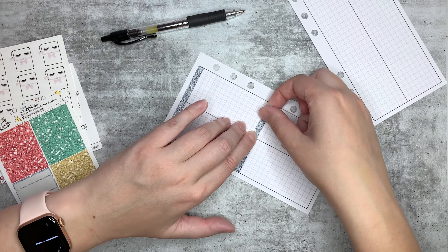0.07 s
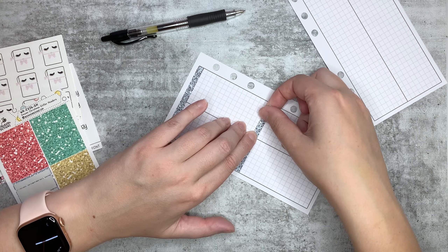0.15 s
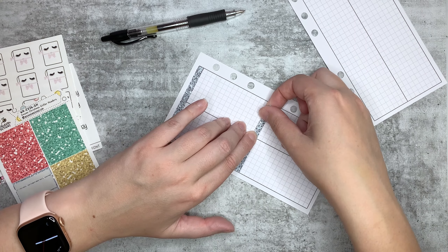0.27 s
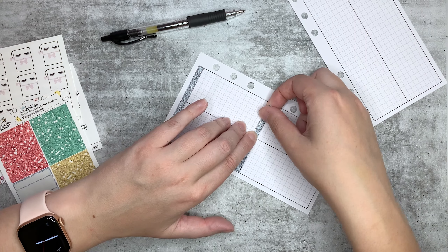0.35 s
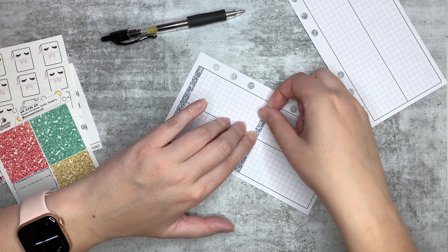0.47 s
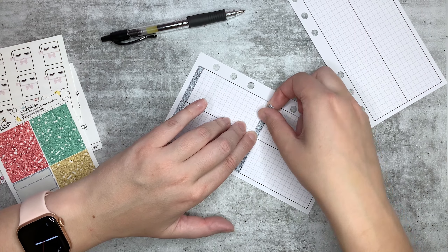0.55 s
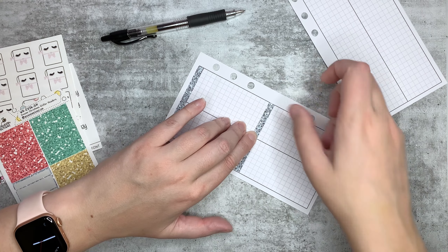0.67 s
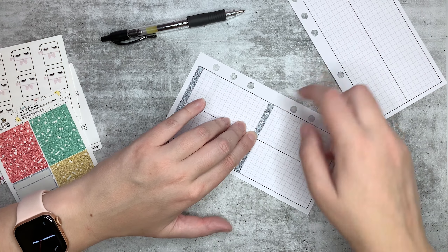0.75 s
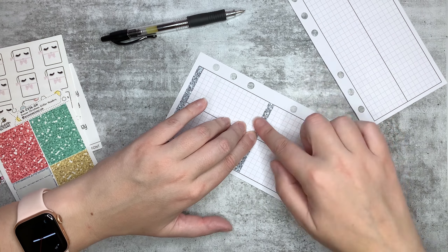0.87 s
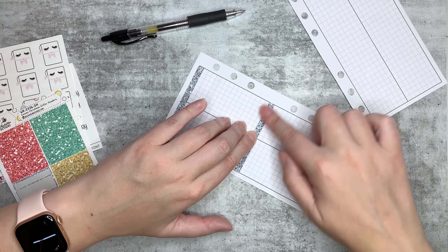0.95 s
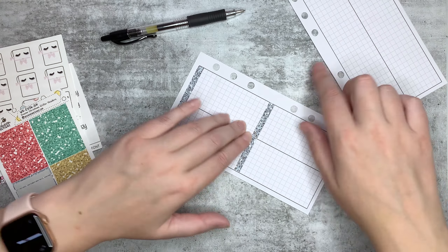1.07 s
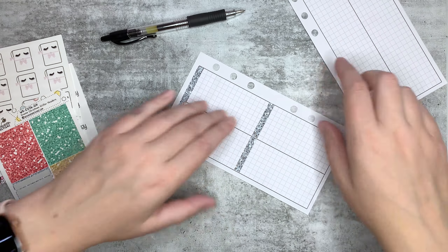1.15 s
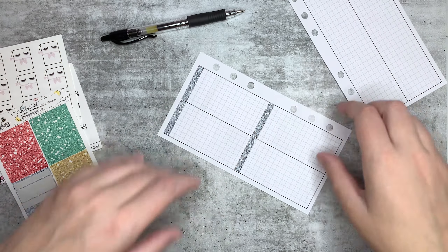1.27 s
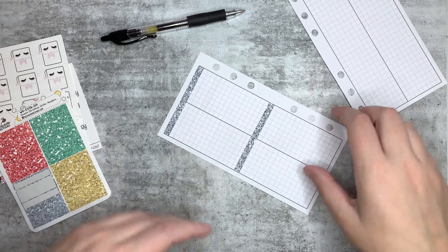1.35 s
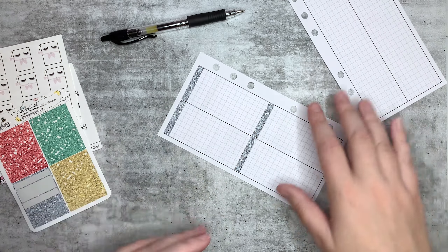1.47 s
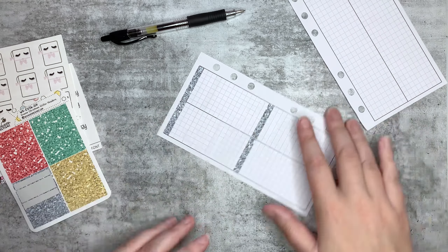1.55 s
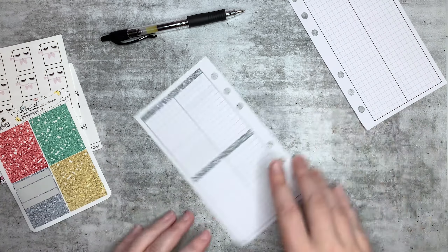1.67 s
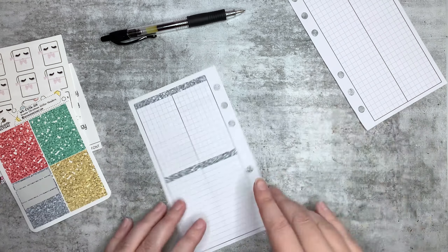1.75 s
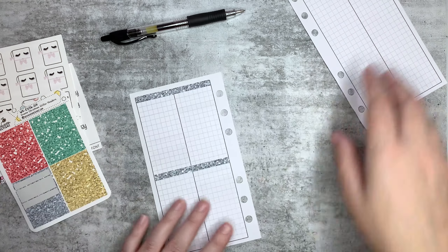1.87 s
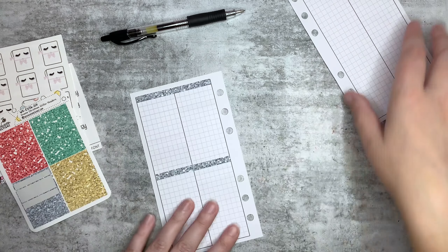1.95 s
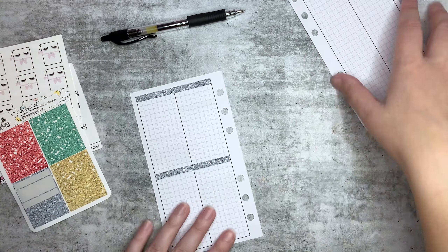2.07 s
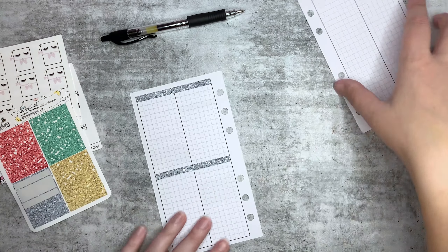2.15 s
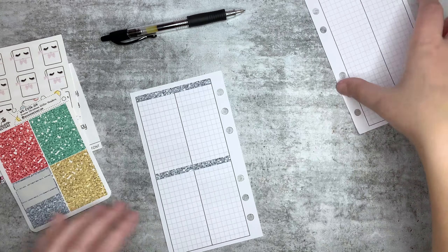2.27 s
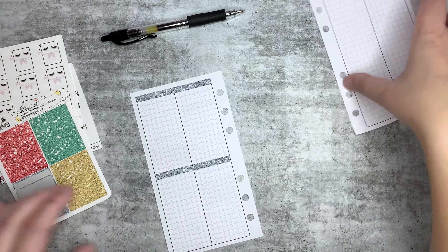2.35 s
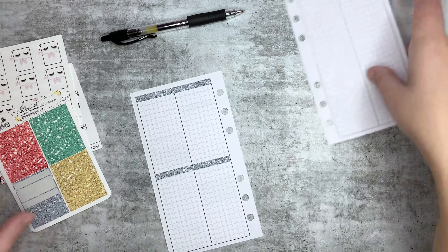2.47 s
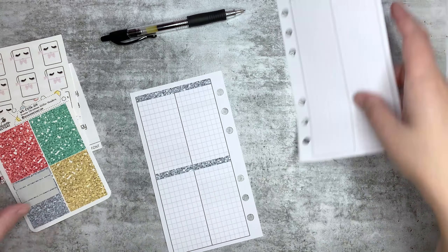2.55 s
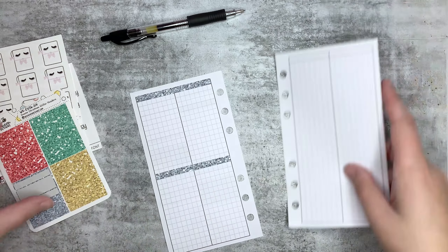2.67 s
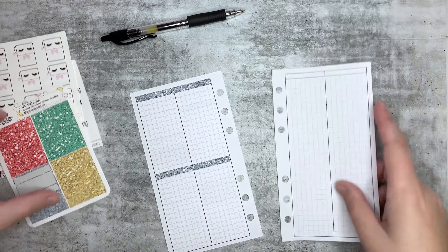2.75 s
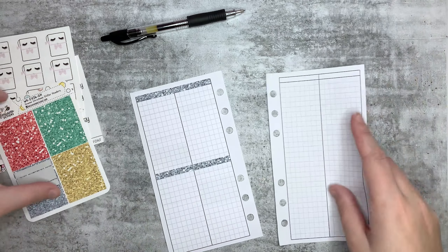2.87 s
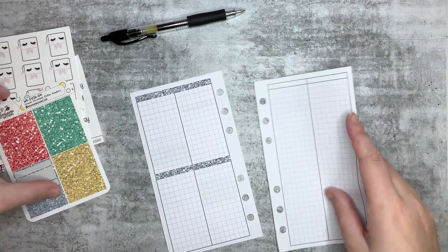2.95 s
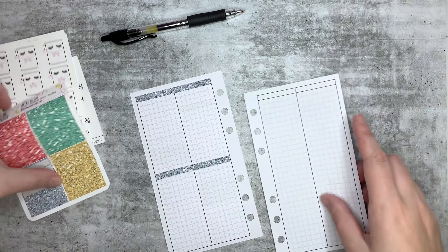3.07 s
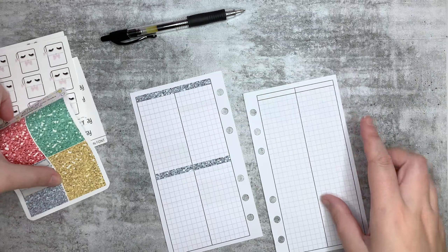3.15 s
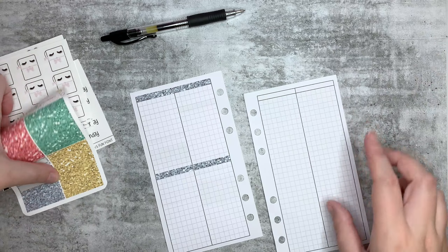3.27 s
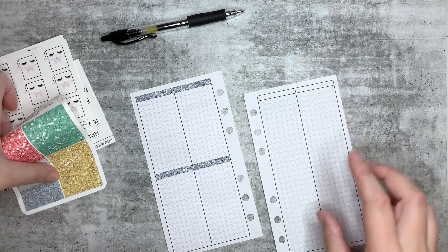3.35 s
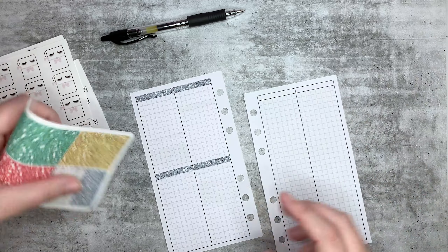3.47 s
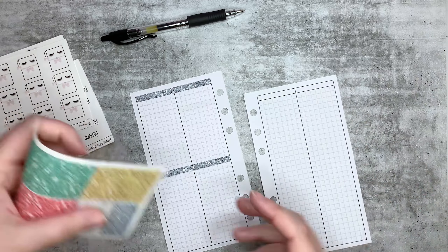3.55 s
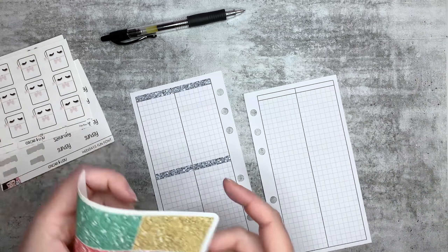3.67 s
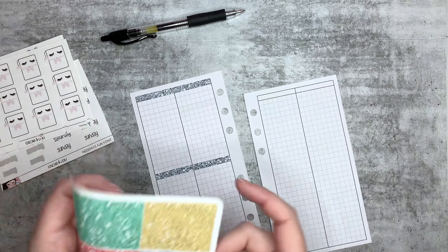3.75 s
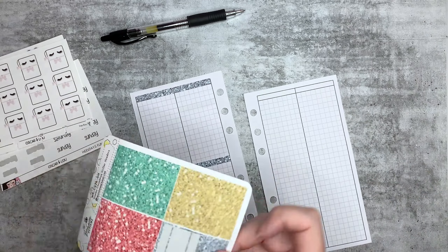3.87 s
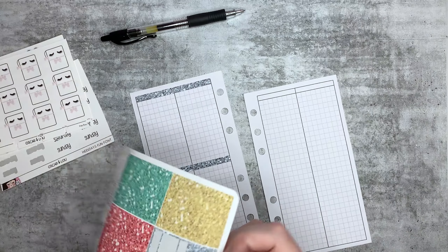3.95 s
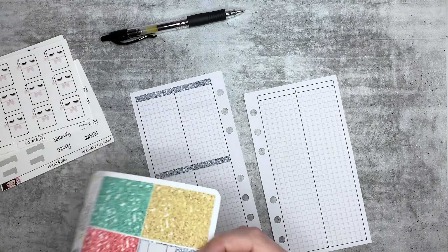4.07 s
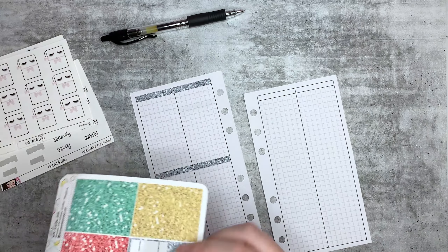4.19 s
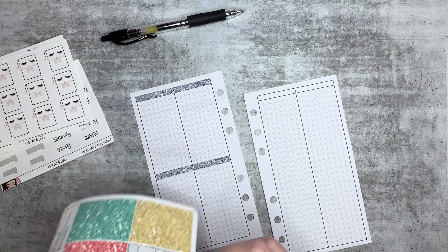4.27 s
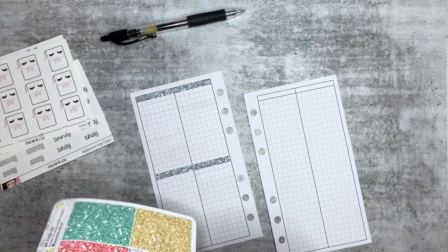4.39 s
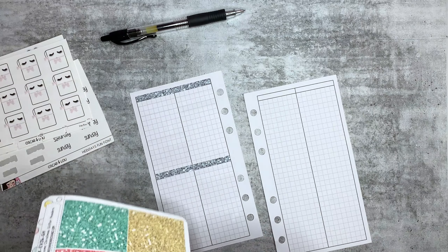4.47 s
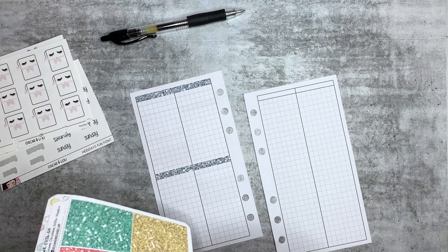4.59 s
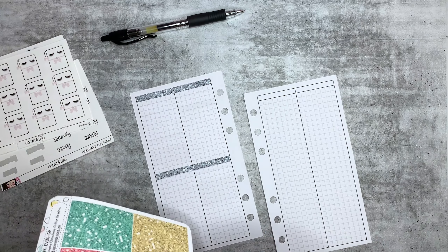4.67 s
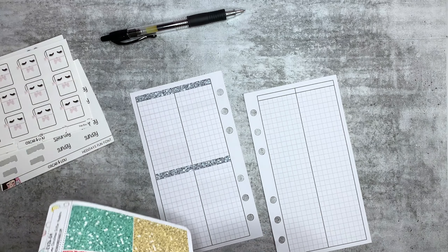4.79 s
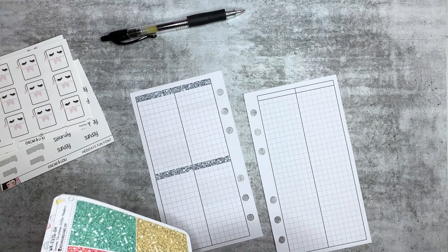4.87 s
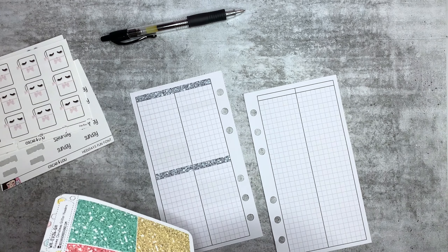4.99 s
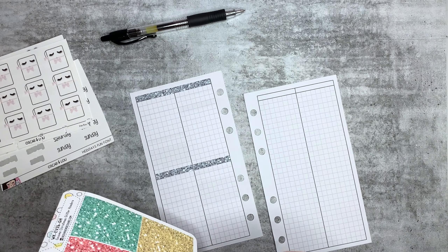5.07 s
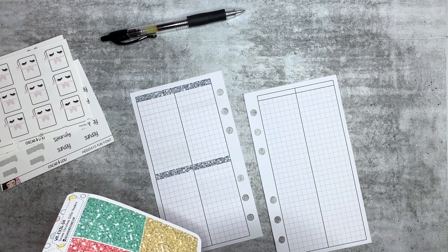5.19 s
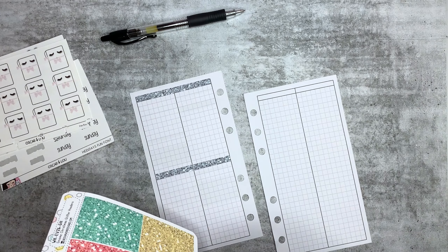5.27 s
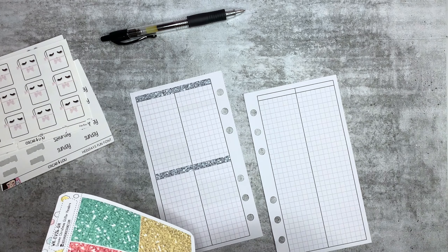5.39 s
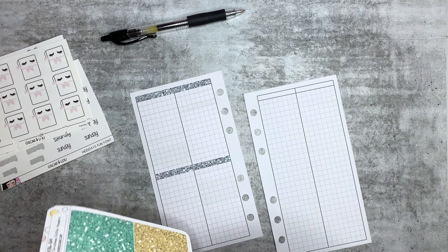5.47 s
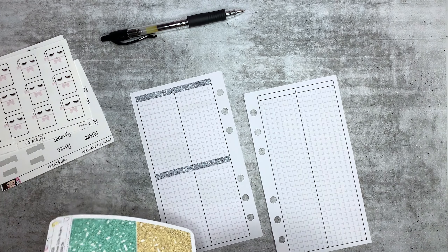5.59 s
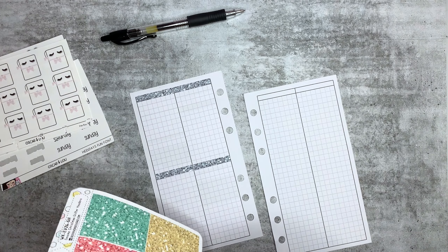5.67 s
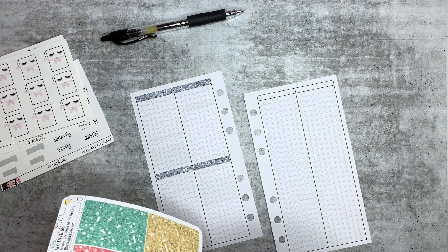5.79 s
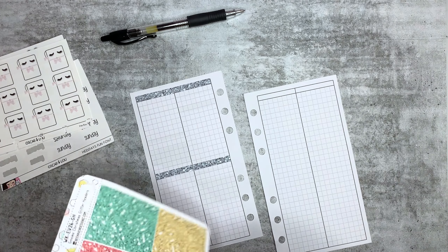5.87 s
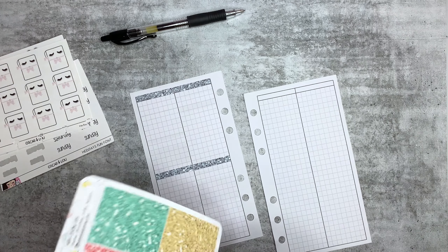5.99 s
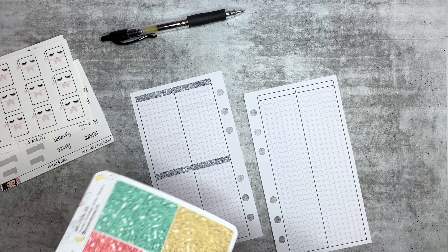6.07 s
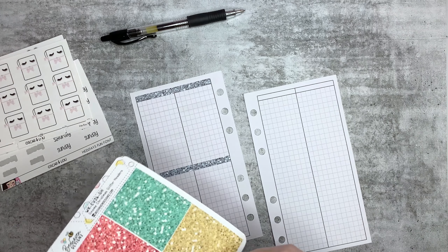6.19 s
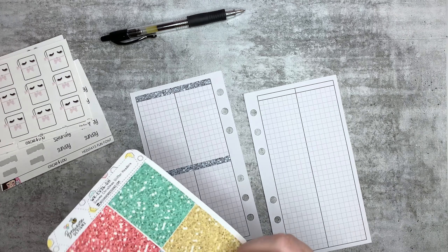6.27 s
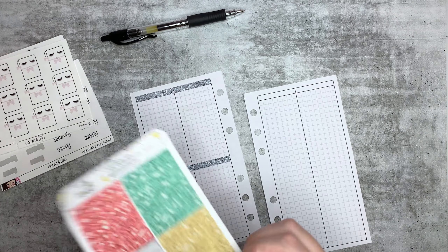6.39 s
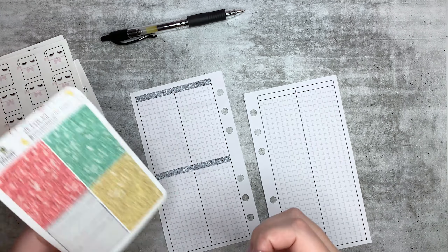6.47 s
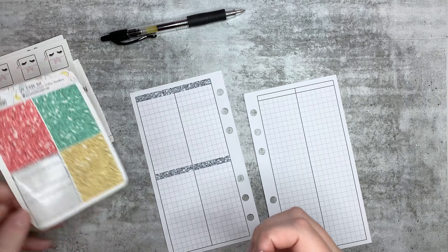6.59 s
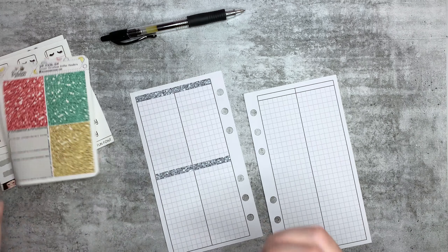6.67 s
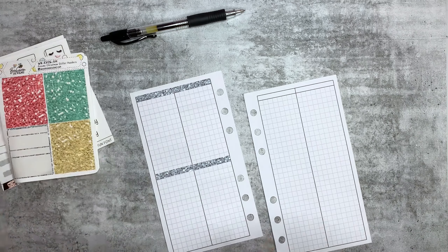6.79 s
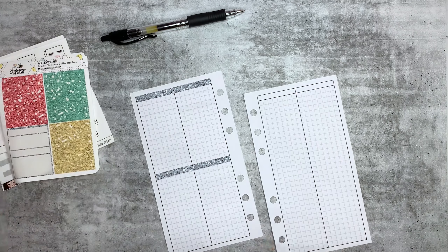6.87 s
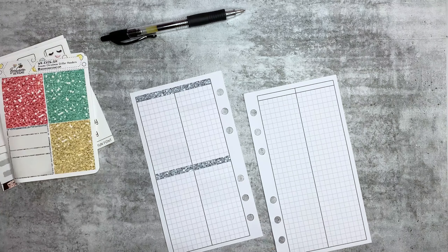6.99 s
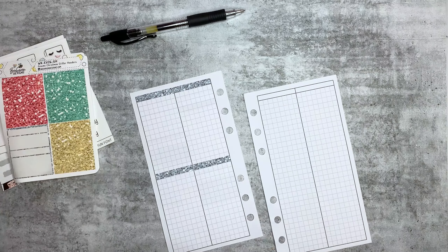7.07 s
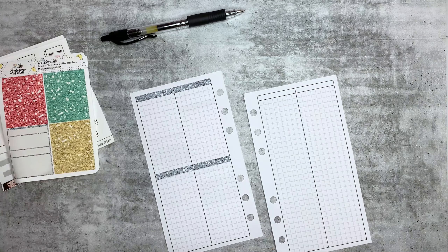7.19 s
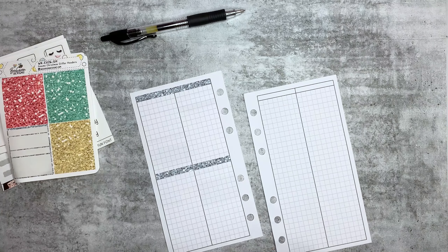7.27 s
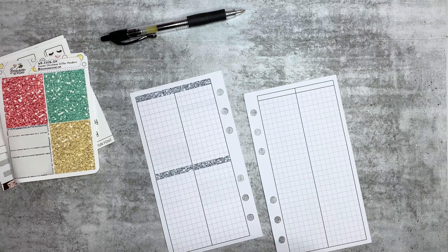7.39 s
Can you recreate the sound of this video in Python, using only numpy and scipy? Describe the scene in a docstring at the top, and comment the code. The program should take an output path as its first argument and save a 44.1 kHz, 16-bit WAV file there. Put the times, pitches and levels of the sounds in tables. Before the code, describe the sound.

Soft paper handling over a faint unsteady low rumble and thin room air. First a sharp tick and a muted hand landing, then airy rubbing and sliding pages. The stiff sheet rustles and snaps busily in the middle, with light desk knocks, then only faint brushing remains. Late on, the sheet crackles, snaps loudly and is laid down. Close overhead stereo pickup, short small-room echo.

```python
"""A low rumble wavers in a quiet room, then stiff paper edges snap and knock the desk under an overhead microphone pair.
Hands smooth a sticker, slide loose pages over a desk mat and flex a sticker sheet: fibres hiss, the sheet rustles.
Snaps are spikes and noise bursts with ringing resonances; rubbing is coloured, uneven noise under stroke-shaped swells.
Sparse echoes answer snaps and rubbing; rumble and air are steady noise, the rumble with a moving level.
"""
import sys
import numpy as np
from scipy import signal
from scipy.fft import rfft, irfft, next_fast_len
from scipy.io import wavfile
from scipy.ndimage import uniform_filter1d, map_coordinates

SR = 44100
rng = np.random.default_rng(int(sys.argv[2]) if len(sys.argv) > 2 else 0)


def transcribe(u):
    """Save the signal u as a 16-bit wav file named by the first command-line argument.

    u: samples, shape (n,) or (channels, n), limited to [-1, 1]; the rate is SR.
    q: integer samples, one column per channel.
    """
    v = np.clip(np.atleast_2d(u).T, -1, 1)
    q = np.round(v * 32767).astype(np.int16)
    wavfile.write(sys.argv[1], SR, q)


N = 327795

# snaps of stiff paper and finger taps, levels relative to their filters:
# start_s, edge_crack_db, sheet_flick_db, flick_pitch_hz, desk_knock_db, knock_pitch_hz
PAPER_SNAPS = [(0.6235, -32, -47, 6400, -58, 576), (0.6318, -12, -37, 1510, -34, 437),
               (0.931, -47, -69, 2750, -50, 440), (0.9416, -37.5, -83, 1260, -44, 450),
               (1.1136, -72, -77, 1100, -47, 450), (1.571, -42.5, -52, 2113, -40.5, 437),
               (2.0021, -39.5, -60.5, 6170, -57, 427), (2.312, -59, -41.5, 5830, -62, 273),
               (2.367, -63, -43.5, 3230, -77, 1100), (2.429, -60, -39, 3440, -47.5, 1150),
               (2.4329, -60, -38, 6100, -49.5, 1110), (2.4383, -60, -39, 2840, -47.5, 1100),
               (2.528, -55, -39.5, 6100, -73, 1100), (2.59, -81, -39.5, 2290, -54, 730),
               (2.7109, -42, -41.5, 1860, -65, 850), (2.753, -48, -35.5, 2220, -63, 1000),
               (2.789, -68, -45, 2400, -60, 1100), (2.947, -64, -42.5, 1380, -52, 880),
               (3.0989, -59, -69, 3800, -40.5, 472), (3.141, -65, -41, 4200, -42.5, 466),
               (3.257, -34.5, -18.5, 2420, -27.5, 545), (3.5275, -55, -29, 1320, -38.5, 855),
               (3.5528, -22.5, -24, 3600, -34.5, 407), (3.7568, -53, -43.5, 1300, -45.5, 1090),
               (3.834, -59, -36.5, 5960, -36, 880), (3.8523, -40.5, -42.5, 2050, -41.5, 347),
               (4.04, -52.5, -38, 2030, -52, 966), (4.0485, -64.5, -38, 2130, -57, 966),
               (4.0854, -30, -36, 2190, -40, 1120), (4.13, -75, -64, 1300, -58, 372),
               (4.26, -70, -76.5, 1160, -61, 270), (4.332, -65, -53, 1110, -52, 690),
               (4.4502, -43, -59.5, 5560, -92.5, 240), (5.7745, -49, -54.5, 5370, -62, 605),
               (6.009, -59, -51.5, 1410, -51.5, 1000), (6.079, -68, -53, 1000, -62.5, 966),
               (6.115, -69, -68.5, 1000, -64.5, 690), (6.149, -69, -72, 1000, -56.5, 734),
               (6.303, -70, -62, 1130, -69, 1100), (6.1772, -40, -55, 6050, -62.5, 1110),
               (6.33, -43, -50.5, 2070, -66, 760), (6.3588, -43.5, -47.5, 5500, -46.5, 730),
               (6.3865, -45.5, -42, 2680, -54.5, 435), (6.418, -8.5, -24.5, 2245, -34.5, 1025),
               (6.6977, -41, -47, 1530, -46.5, 570), (6.7083, -27, -73, 6500, -59, 473),
               (6.7557, -22.5, -37.5, 4540, -52.5, 1230), (6.9282, -39, -44, 2620, -72.5, 1200),
               (7.252, -46, -56.5, 3270, -57, 810), (7.3653, -53, -44, 2500, -82, 1120),
               (7.394, -73.5, -39.5, 1900, -78, 447)]


def amp(db):
    """dB to gain."""
    return 10 ** (np.asarray(db) / 20)


def evened(x):
    """Scales so that the mean of the channels has rms 1."""
    mono = np.atleast_2d(x).mean(0)
    return x / np.sqrt(np.mean(mono ** 2) + 1e-20)


def read(points, hz):
    """Reads a table on a log-frequency axis, holding its end values."""
    f, value = np.transpose(points)
    return np.interp(np.log(hz + 1), np.log(f + 1), value)


def ports(a, b, hz):
    """Two microphone ports share spectrum a; the left also hears b, with a lag and a level lean between them."""
    # likeness of the two ports: pitch_hz, likeness (0 to 1)
    likeness_by_hz = [(60, 0.93), (300, 0.75), (800, 0.26), (2500, 0.53), (5000, 0.043), (7000, 0.73),
                      (9000, 0.98)]
    # left level over right: pitch_hz, lean_db
    lean_by_hz = [(40, -4), (120, -2.5), (400, 0.5), (2000, 1.5), (5000, -2.5), (7500, -0.5)]
    # the treble reaches the left port late, the lower range early: pitch_hz, left_delay_samples
    lag_by_hz = [(6000, -6), (6900, 8)]
    same = np.clip(read(likeness_by_hz, hz), 0, 1)
    late = np.exp(-2j * np.pi * hz * read(lag_by_hz, hz) / SR)
    left = (same * a + np.sqrt(1 - same ** 2) * b) * late
    half_lean_db = read(lean_by_hz, hz) / 2
    return np.array([left * amp(half_lean_db), a * amp(-half_lean_db)])


def coloured(a, b, colour):
    """Gives two raw signals a colour, -80 dB outside its table, and passes them to the ports."""
    size = next_fast_len(N)
    hz = np.fft.rfftfreq(size, 1 / SR)
    outside = (hz < colour[0][0]) | (hz > colour[-1][0])
    gain = amp(np.where(outside, -80, read(colour, hz)))
    return irfft(ports(rfft(a, size), rfft(b, size), hz) * gain, size)[:, :N]


def background():
    """A rumble gathered round one low resonance swells and sinks over faint steady air."""
    # level of the rumble: time_s, level_db
    rumble_level = [(0, -59), (0.6, -56.5), (1.049, -59.5), (1.4, -51.5), (1.85, -51.5), (2.05, -60),
                    (2.3, -54.5), (3.3, -59.5), (3.95, -55.5), (4.3, -61.5), (4.602, -58), (5.1, -64.5),
                    (5.601, -60.5), (5.798, -58), (6.25, -59), (6.5, -58), (6.851, -59.5), (7.43, -54.5)]
    # relative spectrum of the rumble: pitch_hz, level_db
    rumble_colour = [(20, -17), (36, -24.5), (51, -4), (59, 1), (70, -2), (100, -11.5), (160, -18),
                     (260, -33)]
    # relative spectrum of the room air: pitch_hz, level_db
    air_colour = [(150, 5.5), (300, -8.5), (700, -12), (1800, -17), (3000, -20.5), (6500, -25), (8000, -27),
                  (11600, -23.5), (12300, -25.5)]
    s, db = np.transpose(rumble_level)
    rumble = evened(coloured(*rng.standard_normal((2, N)), rumble_colour))
    air = evened(coloured(*rng.standard_normal((2, N)), air_colour))
    rumble_gain = amp(np.interp(np.arange(N) / SR, s, db))
    return rumble_gain * rumble + amp(-75.5) * air


def ringing(t, hz, db, t60, phase):
    """A decaying mode that swells in over about a cycle, reaching the two ports with unlike phase."""
    port_phase = np.array([[0], [.7]])  # radians
    swell_in = 1 - np.exp(-t * hz)
    return amp(db - 60 * t / t60) * np.sin(2 * np.pi * hz * t + phase + port_phase) * swell_in


def placed(x):
    """Shifts the left port in time as the hands move across the desk."""
    # where the hands work, on top of the lag of the ports: time_s, left_delay_samples
    hand_places = [(1.099, 4), (2.3, 0), (2.45, 5.5), (2.95, 2), (3.05, -5.5), (3.6, -1), (4.2, -2)]
    s, delay = np.transpose(hand_places)
    n = np.arange(N)
    left = map_coordinates(x[0], [n - np.interp(n / SR, s, delay)], order=3)
    return np.array([left, x[1]])


def snaps():
    """Each snap is a spike and a burst of a few ms; the sheet rings broadly and the desk in its own modes."""
    # relative spectrum of the cracking edge: pitch_hz, level_db
    crack_colour = [(5000, -34), (7000, -14.5), (9500, -7.5), (11200, -0.5), (12800, -14), (16000, -10.5),
                    (17000, -33)]
    # modes of the desk, levels relative to the knock: pitch_hz, level_db, t60_s
    desk_modes = [(258.5, -1.5, 0.11), (460.4, 5.5, 0.047), (720, -4.5, 0.053), (827, 5.5, 0.021),
                  (1097, 10.5, 0.02), (1406, -10.5, 0.041)]
    # heavier landings of a hand or page: start_s, level_db (before the swell-in), pitch_hz, t60_s
    landings = [(0.636, -37, 153, 0.15), (0.943, -31, 74.3, 0.13), (1.571, -30, 142.6, 0.11),
                (3.553, -48.5, 219, 0.17), (4.26, -49.5, 131, 0.062)]
    t = np.arange(9000) / SR
    crack, body = np.zeros((2, 2, N + len(t)))
    for s, crack_db, flick_db, flick_hz, knock_db, knock_hz in PAPER_SNAPS:
        at = slice(round(s * SR), round(s * SR) + len(t))
        noise = rng.standard_normal((4, len(t)))
        noise[:2, 0] = amp(17.)  # the edge lets go at once
        crack[:, at] += amp(crack_db - 60 * t / 0.024) * noise[:2]
        # the flicked corner of the sheet is one broad resonance with a short ring at its centre
        push = amp(flick_db - 60 * t / 0.017) * (1 - np.exp(-t / 0.0024)) * noise[2:]
        push[:, 20] += amp(flick_db + 3.5)
        broad = amp(10.5) * signal.lfilter(*signal.iirpeak(flick_hz, 2.1, SR), push)
        ring = amp(13) * signal.lfilter(*signal.iirpeak(flick_hz, 9.0, SR), push)
        body[:, at] += signal.lfilter(*signal.butter(2, 900, "high", fs=SR), broad + ring)
        for hz, db, t60 in desk_modes:  # modes near the pitch of the struck spot ring most
            detune, phase = rng.standard_normal(2)
            mode_db = knock_db + db - 11 * abs(np.log2(hz / knock_hz))
            body[:, at] += ringing(t, hz * (1 + 0.012 * detune), mode_db, t60, phase)
    for s, db, hz, t60 in landings:
        body[:, round(s * SR):][:, :len(t)] += ringing(t, hz, db, t60, 0)
    crack = coloured(*crack[:, :N], crack_colour)
    return crack + placed(coloured(*body[:, :N], [(30, 0), (12000, 0)]))


def rustling_on(t):
    """Power of fibres, sheet and desk as the paper settles after each snap."""
    below_snap_db = [-35.5, -22.5, -13.5]  # added to the crack, flick and knock levels
    fade_db_per_s = [278.5, 286, 304]
    power = np.zeros((3, N))
    for s, crack_db, flick_db, _, knock_db, _ in PAPER_SNAPS:
        start_db = np.add([crack_db, flick_db, knock_db], below_snap_db)[:, None]
        at = slice(round(s * SR), round(s * SR) + SR // 4)
        power[:, at] += amp(start_db - np.outer(fade_db_per_s, t[at] - s)) ** 2
    return power


def room(x):
    """Sparse echoes of random sign, each band dying at its own speed."""
    # decay of the room: pitch_hz, t60_s
    room_decay = [(100, 0.29), (3000, 0.2), (10000, 0.091)]
    taps = np.zeros(SR // 2)
    at = np.arange(350, len(taps) - 20, 20)
    taps[at + rng.integers(0, 20, len(at))] = rng.choice([-1., 1.], len(at))
    taps[round(.0098 * SR)] = 0.89  # an early echo from one hard surface close by
    hz, t, z = signal.stft(taps, SR, nperseg=256)
    decay = amp(-60 * t / read(room_decay, hz)[:, None])
    tail = signal.istft(z * decay, SR, nperseg=256)[1]
    return signal.oaconvolve(x, tail[None] / np.linalg.norm(tail), axes=1)[:, :N]


def strokes(t):
    """Power of fibres, sheet and desk: every stroke of hands and pages swells and sinks along one arch."""
    # strokes, each one swell: loudest_s, rise_s, fall_s, fibre_hiss_db, sheet_rustle_db, desk_drag_db
    hand_strokes = [(0.948, 0.013, 0.25, -85, -83, -58.5), (1.057, 0.2, 0.24, -56.5, -94, -70),
                    (1.07, 0.25, 0.032, -72, -68.5, -68), (1.579, 0.057, 0.18, -62, -72, -58.5),
                    (1.73, 0.3, 0.25, -52.5, -71.5, -65.5), (1.776, 0.036, 0.16, -63, -57, -55),
                    (1.829, 0.24, 0.15, -60, -67, -62), (2.21, 0.23, 0.11, -59, -74.5, -66.5),
                    (2.323, 0.39, 0.24, -71, -73.5, -60.5), (2.435, 0.022, 0.51, -70, -54.5, -77),
                    (2.56, 0.46, 0.17, -48, -59.5, -63.5), (2.771, 0.12, 0.084, -48, -54.5, -65),
                    (2.9, 0.29, 0.42, -58.5, -66, -71), (3.1, 0.46, 0.98, -52.5, -59, -71.5),
                    (3.247, 0.14, 0.019, -49.5, -70, -55), (3.332, 0.078, 0.0058, -41.5, -62, -62),
                    (3.436, 0.031, 0.16, -45, -55, -58), (3.557, 0.022, 0.036, -49, -59.5, -45),
                    (3.61, 0.042, 1, -98, -69.5, -63.5), (3.76, 0.022, 0.026, -57.5, -58, -49),
                    (3.831, 0.12, 0.06, -44.5, -54, -54), (3.895, 0.038, 0.11, -51.5, -61, -81),
                    (4.09, 0.1, 0.18, -58.5, -58, -65.5), (4.289, 0.32, 0.15, -58.5, -69, -67.5),
                    (4.461, 0.22, 0.13, -66, -75, -100), (4.66, 0.092, 0.021, -62, -70, -91.5),
                    (4.916, 0.088, 0.058, -61, -69, -66), (5.109, 0.057, 0.11, -65.5, -73.5, -85),
                    (5.26, 0.045, 0.24, -66, -76.5, -101), (5.591, 0.062, 0.19, -56.5, -75.5, -104),
                    (5.66, 0.033, 0.15, -83.5, -73, -68), (6.011, 0.11, 0.12, -50, -65.5, -61.5),
                    (6.231, 0.32, 0.2, -63, -72, -70), (6.404, 0.2, 0.1, -58, -67, -67.5),
                    (6.641, 0.059, 0.032, -76.5, -81, -107), (6.713, 0.039, 0.025, -55, -64.5, -60),
                    (7.112, 0.2, 0.15, -75.5, -111, -79.5), (7.249, 0.12, 0.022, -67.5, -76, -70.5),
                    (7.301, 0.13, 0.39, -79.5, -75, -67), (7.379, 0.05, 0.078, -89, -79, -63)]
    pointedness = 4.97  # the higher, the more pointed a stroke
    power = np.zeros((3, N))
    for s, rise, fall, *dbs in hand_strokes:
        away = np.where(t < s, (s - t) / rise, (t - s) / fall)
        near = np.clip(1 - away, 0, 1)
        arch = np.sin(np.pi / 2 * near) ** pointedness
        power += (amp(dbs)[:, None] * arch) ** 2
    return power


def drift(seconds):
    """Slow random wandering of rms 1: noise averaged twice over the given time."""
    size = int(seconds * SR) + 1
    once = uniform_filter1d(rng.standard_normal(N), size)
    return evened(uniform_filter1d(once, size))


def hiss(colour, grit_db, flutter_db, patchy_db):
    """Dense noise with uneven grains; it flutters as the contact slips, and its resonances wander as paper bends."""
    grains = uniform_filter1d(rng.exponential(1, N) ** 2, 24)
    grit = amp(grit_db * grains + flutter_db * drift(0.023))
    noise = coloured(*(grit * rng.standard_normal((2, N))), colour)
    z = signal.stft(noise, nperseg=512, noverlap=384)[2]
    # random gains, smoothed over neighbouring frequencies and then over time
    patches = uniform_filter1d(rng.standard_normal(z.shape[1:]), size=3, axis=0)
    patches = uniform_filter1d(patches, size=14, axis=1)
    z = z * amp(patchy_db * patches / patches.std())
    return evened(signal.istft(z, nperseg=512, noverlap=384)[1][:, :N])


def scrape(t):
    """A fingertip smooths the sticker: noise in one narrow resonance that climbs along the stroke."""
    # the fingertip's path: start_s, end_s, from_hz, to_hz, width_hz, level_db
    fingertip = (0.99, 1.1, 1050, 1800, 220, -63)
    start, end, from_hz, to_hz, width_hz, db = fingertip
    along = np.clip((t - start) / (end - start), 0, 1)
    turn = 2 * np.pi * np.cumsum(from_hz + (to_hz - from_hz) * along) / SR
    a, b = signal.lfilter(*signal.butter(2, width_hz / 2, fs=SR), rng.standard_normal((2, N)))
    tone = evened(a * np.cos(turn) + b * np.sin(turn))
    return amp(db) * np.sin(np.pi * along) * tone


def rubbing():
    """Fibres, sheet and desk answer the same strokes and snaps in their own ranges."""
    # relative spectra of paper fibres, flexed sheet and dragging over the desk: pitch_hz, level_db
    fibre_colour = [(3200, -16.5), (5500, -3.5), (6800, 3.5), (8300, 0.5), (10500, 4), (11500, 6.5),
                    (12400, -5.5), (15600, 2.5), (16200, -53)]
    sheet_colour = [(1000, -12), (1620, -10.5), (2100, 3), (2700, 0.5), (3500, 1.5), (4500, 2.5),
                    (6200, -8.5), (8000, -1)]
    drag_colour = [(140, 7), (250, 1.5), (470, 3.5), (700, 0.5), (1150, 1.5), (1600, -5), (3300, -18)]
    t = np.arange(N) / SR
    levels = np.sqrt(strokes(t) + rustling_on(t))
    fibres = hiss(fibre_colour, grit_db=2.0, flutter_db=2.5, patchy_db=5.0)
    sheet = hiss(sheet_colour, grit_db=1.95, flutter_db=0.5, patchy_db=4.0)
    drag = hiss(drag_colour, grit_db=2.5, flutter_db=1.0, patchy_db=3.5)
    return levels[0] * fibres + placed(levels[1] * sheet + levels[2] * drag + scrape(t))


def scene():
    """Hands, paper, their echo and the background."""
    hits, rubs = snaps(), rubbing()
    echo = room(amp(-16.5) * hits + amp(-11.5) * rubs)
    return hits + rubs + echo + background()


def record(dry):
    """The band limit of the recorder: a steep low-pass at 16900 Hz."""
    low_pass = signal.firwin(511, 16900, window=("kaiser", 9), fs=SR)
    return signal.oaconvolve(dry, low_pass[None], "same")


dry = scene()
out = record(dry)
transcribe(out)
```